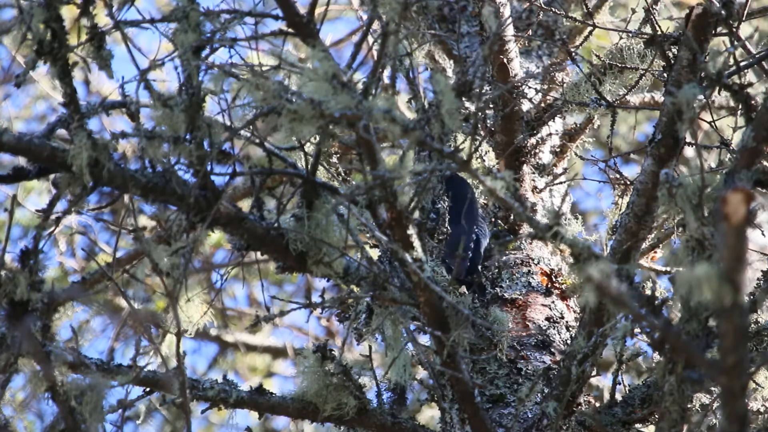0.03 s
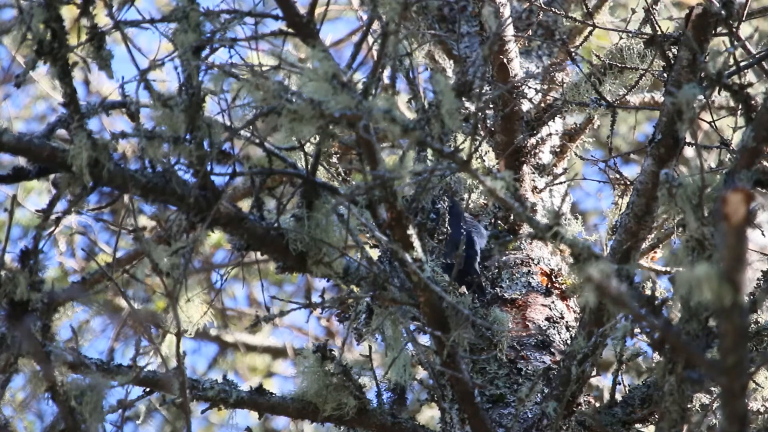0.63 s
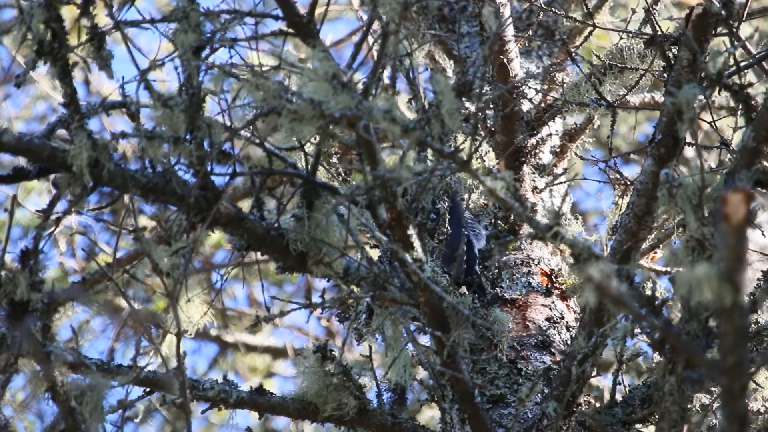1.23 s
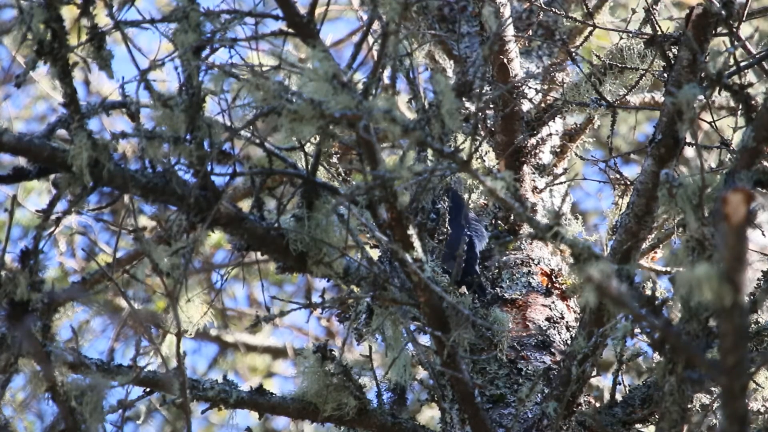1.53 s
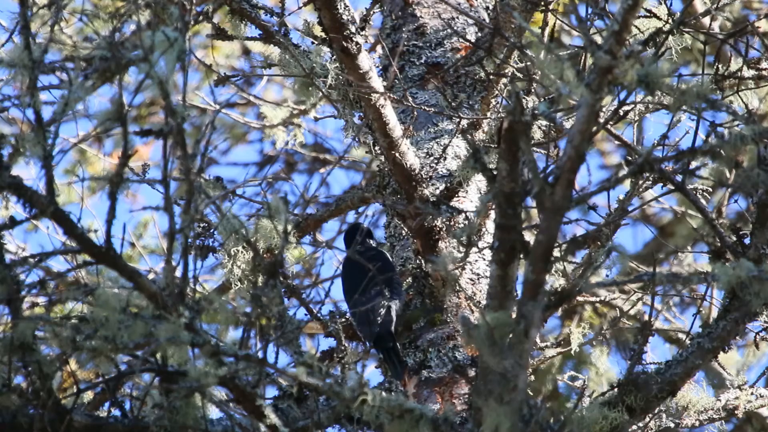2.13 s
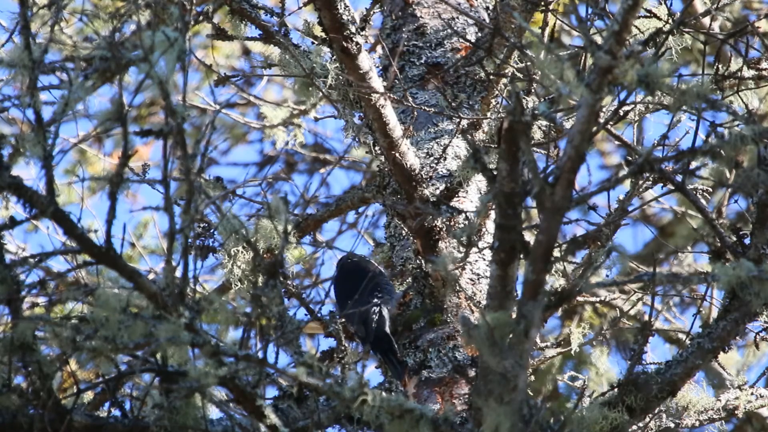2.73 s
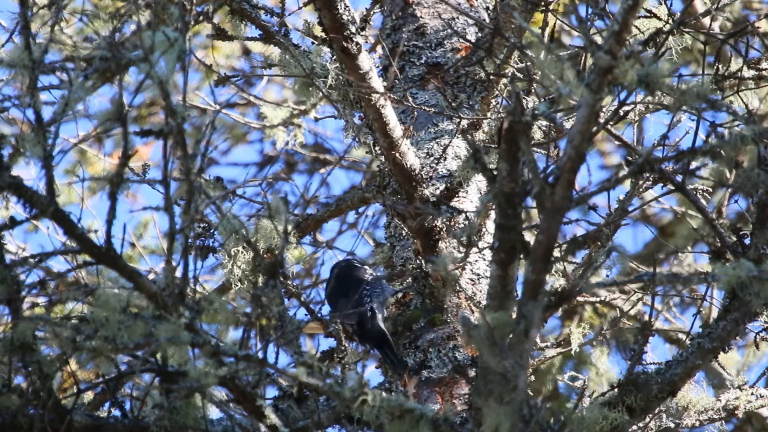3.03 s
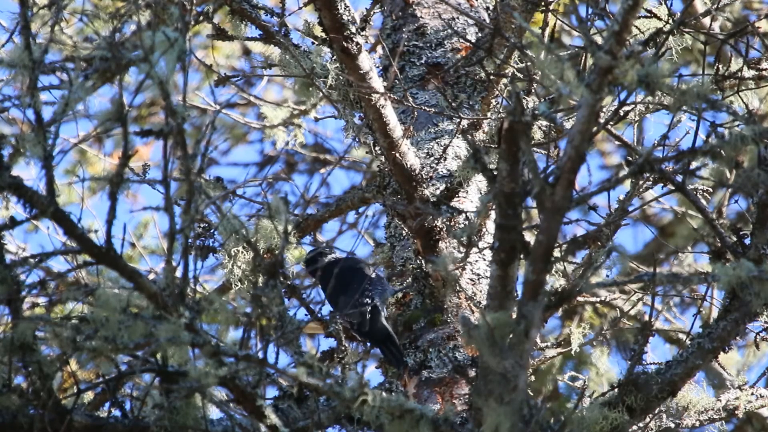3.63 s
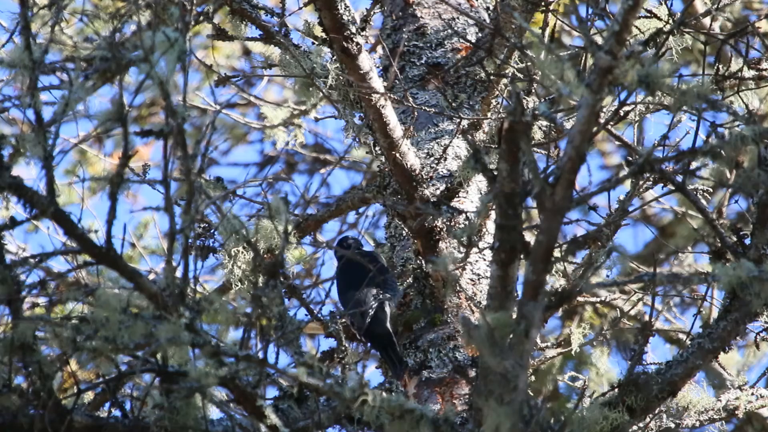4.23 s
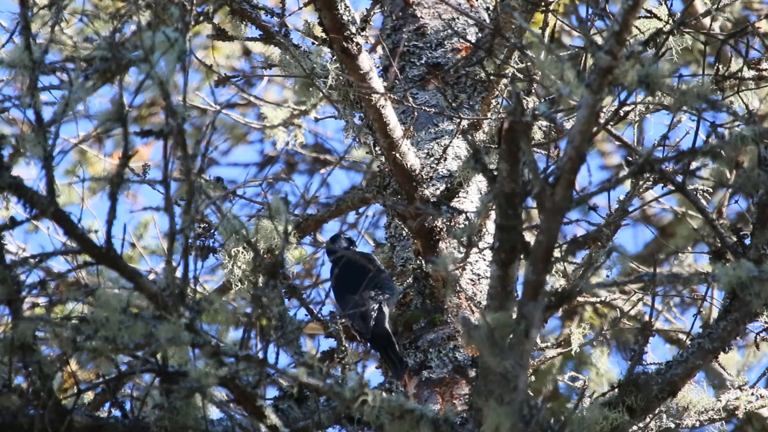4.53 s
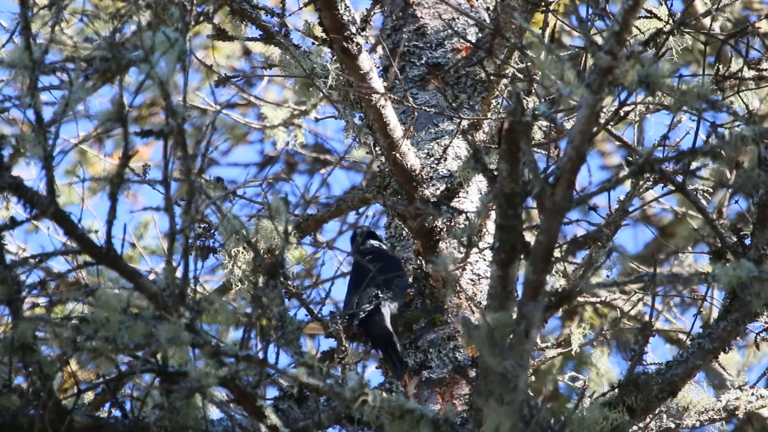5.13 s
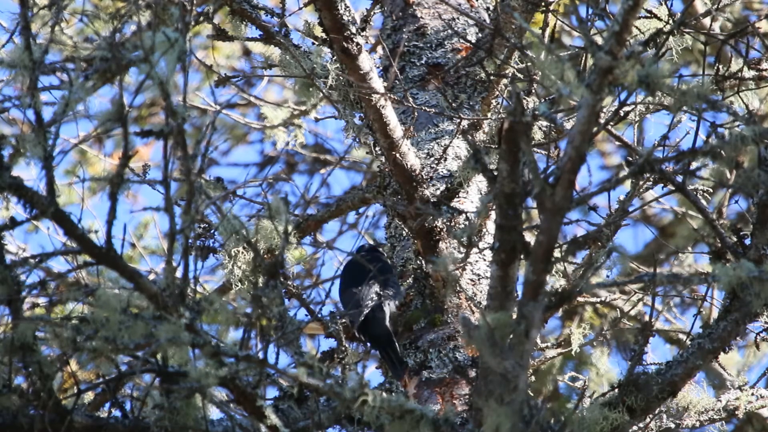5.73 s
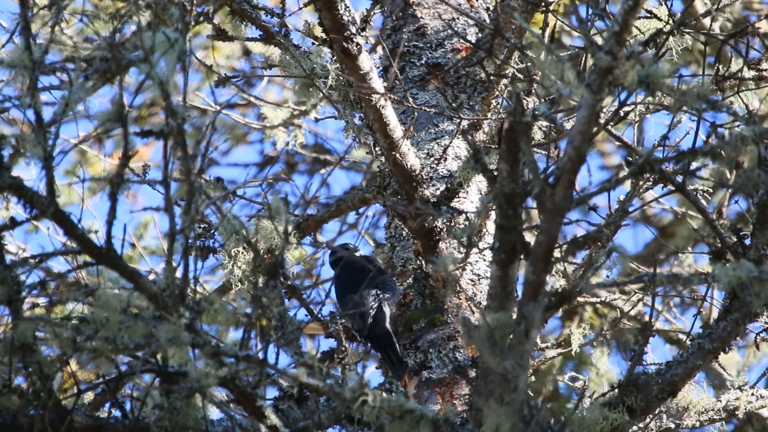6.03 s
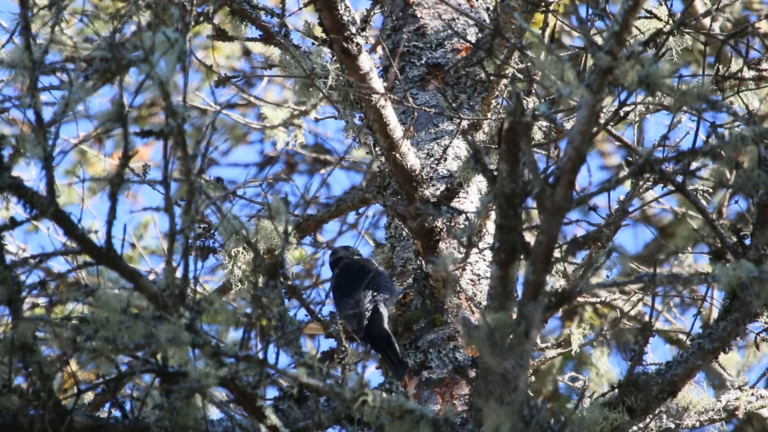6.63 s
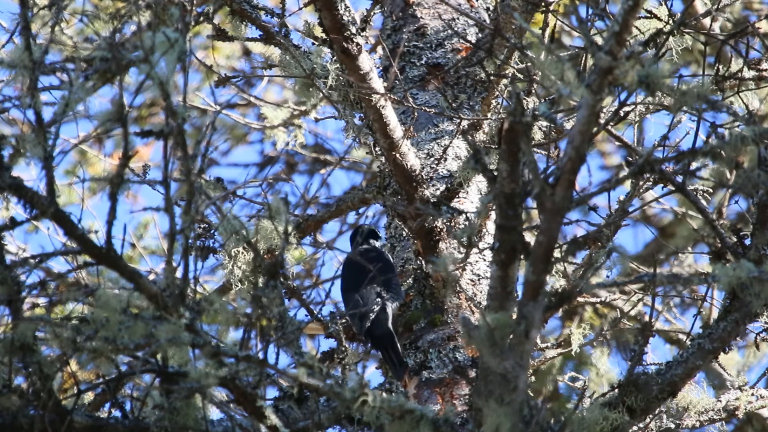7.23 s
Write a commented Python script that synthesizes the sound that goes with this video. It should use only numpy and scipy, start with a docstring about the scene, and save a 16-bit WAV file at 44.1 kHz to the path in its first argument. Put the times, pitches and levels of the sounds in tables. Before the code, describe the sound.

From the start a vehicle passes loudly on a forest road, moving left to right and closest at about 1.5 seconds. Its tyres roar and sizzle on grit over a low rumble. From 0.8 seconds they thump over a string of bumps that shake the body, and the engine note sinks. At 2.2 seconds this cuts off abruptly to much quieter woodland: a soft steady hiss, a faint deep hum and a distant engine. From 2.3 seconds a woodpecker taps a trunk in faint, hollow single knocks, unevenly, about five a second, until the end at around 7.4 seconds. Light scratching on bark is busy until 3 seconds, then sparse, with soft rustles. Dry flakes snap off, most sharply near 5.1 and 5.6 seconds. Around 4 seconds the far engine dips, changes gear with a brief swell of rumble, then keeps receding beneath the pecking.

```python
"""First a vehicle passes left to right along a forest road: its tyres roar, sizzle on grit and thump
over bumps that shake the body, while the engine note sinks. At 2.2 s it breaks off into the steady
hiss of the wood, a deep hum and a far engine. A woodpecker then knocks in single blows, each exciting
the modes of a trunk, and flicks off bits of bark. Near 4 s the far engine changes gear, and it goes
on receding as the pecking continues."""
import sys
import numpy as np
from scipy import signal
from scipy.fft import rfft, irfft
from scipy.io import wavfile
from scipy.ndimage import uniform_filter1d, map_coordinates

SR = 44100
rng = np.random.default_rng(int(sys.argv[2]) if len(sys.argv) > 2 else 0)


def master(y):
    """Save y as 16-bit WAV."""
    cut = np.clip(np.atleast_2d(y).T, -1, 1)
    pcm = np.round(cut * 32767)  # scale
    wavfile.write(sys.argv[1], SR, pcm.astype(np.int16))


N = 321048
TIME = np.arange(N) / SR

# tyres on the changing road surface (time [s], relative roar level [dB], relative tread level [dB])
ROAD_SURFACE = [(0.03, -21.5, -32), (0.26, -20.5, -33.5), (0.69, -20.5, -30.5), (1.35, -23, -34),
                (1.41, -19, -34), (1.55, -27, -32.5), (1.7, -27, -37.5), (1.89, -27.5, -32.5),
                (2.17, -25.5, -31.5)]
# swells of the roar on coarse road (time [s], half-width [s], rise [dB])
COARSE_ROAD = [(0.498, 0.032, 2.2), (0.76, 0.023, 1), (2.154, 0.032, 1.5)]
# sizzle of loose grit (time [s], relative level [dB])
LOOSE_GRIT = [(0.03, -56), (0.35, -51), (1.28, -53), (1.29, -52), (1.64, -57.5), (1.73, -60), (2.15, -56)]
# spectra of tyre roar, tread hiss, grit, body boom and body rumble (frequency [Hz], density [dB])
ROAR_SPECTRUM = [(150, -44), (300, -10.5), (420, -11.5), (600, -4.5), (760, -1.5), (920, 0.5), (1005, 3),
                 (1085, -3), (1500, -10.5), (2000, -27.5), (4000, -54)]
TREAD_SPECTRUM = [(700, -14), (1300, -1.5), (1800, 0.5), (2500, -7), (3500, -13), (5000, -22),
                  (9000, -46.5)]
GRIT_SPECTRUM = [(1500, -36), (4000, 1.5), (6500, 3), (8500, 0.5), (10500, -1.5), (12500, -5.5),
                 (15500, -26)]
BOOM_SPECTRUM = [(20, -28), (45, -18), (62, -3.5), (82, -1.5), (115, 4), (170, -7.5), (400, -51)]
RUMBLE_SPECTRUM = [(60, -30), (110, -18.5), (150, -9.5), (180, -6), (218, 1.5), (290, -2.5), (350, -7.5),
                   (430, -2.5), (600, -12.5), (1000, -24), (2500, -71)]
# diffuse field at the microphone pair (frequency [Hz], side minus mid [dB])
DIFFUSE_WIDTH = [(60, -9), (200, -16), (380, -9), (700, -7), (1300, -4), (2400, 0.5), (4400, 0), (15000, 1)]
# near exhaust harmonics; the fourth is the firing tone (order [per engine cycle], relative level [dB])
NEAR_HARMONICS = [(2, -15), (4, 1), (6, -6)]
# tyres striking bumps (time [s], relative level [dB], frequency [Hz], ring t60 [s], body shake [dB])
BUMPS = [(0.766, -4, 826, 0.013, -31.5), (.817, -9.5, 670, 0.025, -29), (.912, -3.5, 550, .013, -23.5),
         (1.002, -9, 720, 0.029, -21.5), (1.101, -15, 223, 0.2, -28), (1.136, -17, 94, 0.16, -34),
         (1.325, -10, 586, 0.039, -22.5), (1.4288, -1.5, 335, .026, -32), (1.6141, -.5, 420, .014, -21.5),
         (1.789, -14, 209, 0.085, -21.5), (1.93, -15, 230.4, .08, -22), (2.104, -9, 275, 0.052, -25.5),
         (2.129, -9.5, 519, 0.01, -32), (2.16, -6.5, 188, 0.034, -27.5)]
# scuffs and thin squeaks (time [s], frequency [Hz], nominal bandwidth [Hz], half-width [s], level [dB])
SCUFFS = [(.815, 4900, 2500, .012, -41), (1.195, 9900, 500, 0.017, -42.5), (1.23, 12600, 400, 0.0089, -43),
          (1.24, 14800, 1500, .04, -61), (1.335, 5640, 2000, 0.02, -40), (1.52, 14400, 2600, 0.038, -46)]
# spectra of still forest air and far road rumble (frequency [Hz], density [dB])
FOREST_SPECTRUM = [(20, -84), (55, -83.5), (95, -85), (160, -81), (280, -85), (420, -88), (600, -90.5),
                   (780, -89), (1000, -89.5), (1300, -95.5), (2200, -100), (5000, -101.5), (10000, -106),
                   (15500, -111)]
FAR_ROAD_SPECTRUM = [(90, -30), (150, -8), (200, 2), (290, -1), (360, -9.5), (600, -14), (1200, -49)]
# far exhaust harmonics in each gear (order [per engine cycle], relative level [dB])
LOW_GEAR_HARMONICS = [(4, 0.5), (5, -8), (6, -14), (7, -6), (8, -4.5), (9, -11)]
NEXT_GEAR_HARMONICS = [(4, 1.5), (5, -40), (6, -19), (7, -11), (8, -27)]
# beak blows, in relative levels (time [s], hollow knock [dB], hard knock [dB], bark crunch [dB])
BEAK_BLOWS = [(2.349, -46, -51.5, -61), (2.654, -59, -52.9, -65), (2.801, -52.5, -55.5, -63),
              (3.098, -47.5, -49, -60), (3.231, -54, -57, -62), (3.386, -59, -46, -63),
              (3.516, -45.5, -51.5, -61), (3.864, -42, -49, -64), (4.024, -42, -55, -63),
              (4.262, -45, -53, -60.5), (4.472, -56, -61, -77), (4.751, -47, -45.5, -68),
              (4.899, -42.5, -41, -65.0), (5.133, -41.5, -51.5, -69), (5.245, -45, -54, -64),
              (5.365, -54, -58, -63), (5.642, -50, -57, -61), (5.785, -43, -51.5, -61),
              (5.95, -46.5, -48, -63), (6.335, -58, -52.5, -65), (6.486, -46, -49.5, -64),
              (6.642, -51, -49, -63), (6.942, -46.0, -53, -62), (7.124, -49.5, -53, -61),
              (7.269, -50, -59.3, -61)]
# normal modes of the trunk (frequency [Hz], relative level [dB], t60 [s])
TRUNK_MODES = [(384.8, 11, 0.059), (390, -5, 0.04), (544, -0.5, 0.064), (583, 4.5, 0.036),
               (644, -0.5, 0.039), (754, 2.5, 0.026), (850, -4.5, 0.028), (980, -11, 0.03),
               (1340, -20, 0.018)]
# soft rustles (time [s], frequency [Hz], nominal bandwidth [Hz], half-width [s], level [dB])
SOFT_RUSTLES = [(2.36, 3400, 1800, 0.035, -70), (2.79, 3400, 2000, .07, -67), (4.05, 7000, 3980, .03, -68),
                (5.42, 4500, 5000, .1, -66), (5.68, 5500, 3510, 0.044, -68), (6.23, 171, 257, 0.044, -50),
                (6.5, 5970, 7000, 0.14, -68), (6.99, 1306, 700, 0.07, -60.5), (7.1, 7000, 7000, 0.18, -70)]
# bark flakes snapping (time [s], peak level [dB], frequency [Hz], left minus right [dB])
BARK_SNAPS = [(2.732, -45, 3000, 6), (3.053, -42, 2760, 2), (3.411, -42, 3005, 0), (3.866, -46, 9000, 2),
              (4.027, -38, 6860, -1), (4.264, -45, 11000, 2), (4.268, -50, 2500, 0), (5.117, -33, 8700, 2),
              (5.128, -34, 8800, -1), (5.644, -31, 6200, -1), (5.650, -37, 5470, 2), (5.954, -52, 2000, 2),
              (5.976, -41, 1900, -2), (6.943, -40, 4500, 2), (7.125, -36, 6460, 0), (7.272, -41, 7840, 4)]

PASSES_S, SPEED_M_S, DISTANCE_M = 1.487, 7.2, 3.1  # straight path, at its nearest point
LEVEL_LAG_MS, SWING_LAG_MS = -0.033, 0.093  # left lag behind right: on drawing level, swing either way
BOOM_DB, RUMBLE_DB, SHAKE_T60_S = -34.5, -29, 0.96  # nearest boom, smooth-road rumble, decay of a shake
NEAR_HZ, EASES_S, COAST_HZ, COAST_TIME_S = 161.3, 0.94, 122.3, 0.58  # firing tone as the throttle eases
NEAR_DB, NEAR_FADE_DB_PER_S = -37, 6.5
THUMP_LOW_HZ, THUMP_TOP_HZ = 100, 2300  # a small body radiates little bass; soft rubber dulls the top
CUT_S = 2.214  # the vehicle breaks off
FOREST_DB, HUM_HZ, HUM_DB = -55.5, 28.8, -61.5
FAR_ROAD_DB, FAR_FADE_DB_PER_S = -53.5, 2
SURGE_DB, SURGE_S, SURGE_HALF_WIDTH_S = 4.5, 4.36, 0.2  # far rumble swells as the gear bites
LOW_GEAR_HZ, LOW_SETTLED_HZ, LOW_SETTLE_S = 134, 119.5, 1.8
LOW_GEAR_DB, LOW_FADE_DB_PER_S = -52, 1.7
CLUTCH_S, CLUTCH_SAG_HZ_PER_S, CLUTCH_FADE_DB_PER_S = 4.02, 55, 55
BITES_S, BITE_TIME_S = 4.24, 0.15  # the next gear engages
NEXT_GEAR_HZ, NEXT_SETTLED_HZ, NEXT_SETTLE_S = 157.7, 143.3, 0.241
NEXT_GEAR_DB, NEXT_FADE_DB_PER_S = -59, 1.5
BUSY_PER_S, IDLE_PER_S, BUSY_UNTIL_S, CRACKLE_DB = 95, 22, 3.1, -54.5  # scratching on the bark
TOP_HZ = 15650


def undb(db):
    """Amplitude ratio of a level in decibels."""
    return 10 ** (np.asarray(db) / 20)


def unit(x):
    """Normalisation to an rms of one."""
    return x / np.sqrt(np.mean(x ** 2))


def since(s):
    """Time elapsed after s, zero before it."""
    return np.maximum(TIME - s, 0)


def fade(t, t60):
    """Exponential decay, by 60 dB in t60 seconds."""
    return np.exp(-np.log(1000) * t / t60)


def swell(s, half_width):
    """Gaussian envelope centred on time s."""
    return np.exp(-((TIME - s) / half_width) ** 2)


def settle(s, from_hz, to_hz, time_s):
    """Exponential relaxation of a frequency, starting at time s."""
    return to_hz + (from_hz - to_hz) * np.exp(-since(s) / time_s)


def curves(table):
    """Linear interpolation of each column over time."""
    s, *columns = np.transpose(table)
    return [np.interp(TIME, s, column) for column in columns]


def drift(rate_hz):
    """Smoothed random fluctuation with an rms of one."""
    hold = int(SR / rate_hz)
    steps = np.repeat(rng.standard_normal(N // hold + 2), hold)
    return unit(uniform_filter1d(steps, hold)[rng.integers(hold):][:N])


def colour(spectrum, size=N):
    """Spectral envelope: the gain at each frequency bin."""
    hz, db = np.transpose(spectrum)
    return undb(np.interp(np.log(np.fft.rfftfreq(size, 1 / SR) + 1), np.log(hz), db))


def noise(spectrum):
    """Spectrally shaped noise with an rms of one."""
    return unit(irfft(rfft(rng.standard_normal(N)) * colour(spectrum), N))


def diffuse(spectrum):
    """A diffuse field is coherent between two microphones in the bass, incoherent in the treble."""
    mid, side = rfft(rng.standard_normal((2, N))) * colour(spectrum)
    side = side * colour(DIFFUSE_WIDTH)
    return irfft([mid + side, mid - side], N) / np.std(irfft(mid, N))


def band(x, hz, width_hz, stages=1):
    """Two-pole resonators in cascade."""
    for _ in range(stages):
        x = signal.lfilter(*signal.iirpeak(min(hz, 0.45 * SR), hz / width_hz, fs=SR), x)
    return x


def pan(db):
    """Left and right gains for a level difference."""
    return undb(np.array([[db], [-db]]) / 2)


def add(out, s, sound):
    """Superposition of a short sound at time s."""
    start = int(s * SR)
    out[:, start:start + sound.shape[-1]] += sound[..., :N - start]


def bearing():
    """Azimuth of the vehicle from its nearest point in radians, negative to the left."""
    return np.arctan(SPEED_M_S * (TIME - PASSES_S) / DISTANCE_M)


def drive_by(x):
    """Time and level differences: the nearer microphone hears the vehicle earlier and louder."""
    lag_ms = LEVEL_LAG_MS + SWING_LAG_MS * np.sin(bearing())
    sides = np.array([[1], [-1]]) / 2
    positions = np.arange(N) - sides * lag_ms * SR / 1000
    delayed = np.array([map_coordinates(x, [p], order=5, mode="nearest") for p in positions])
    return delayed * undb(sides * (0.7 - 14 * lag_ms))


def vehicle():
    """Rolling contact radiates broadband noise, which arrives directly and by scattering from trees."""
    roar_db, tread_db = curves(ROAD_SURFACE)
    grit_db, = curves(LOOSE_GRIT)
    roar_db += sum(db * swell(s, half_width) for s, half_width, db in COARSE_ROAD)
    boom_db = BOOM_DB + 20 * np.log10(np.cos(bearing()))  # inverse-distance law
    # (spectrum, level [dB], scattered relative to direct [dB]): needles scatter the treble most
    layers = [(BOOM_SPECTRUM, boom_db + 2 * drift(8.63), -14),
              (RUMBLE_SPECTRUM, body_shake_db() + 2 * drift(44.9), -8),
              (ROAR_SPECTRUM, roar_db + 0.89 + 0.72 * drift(39.4), -7),
              (TREAD_SPECTRUM, tread_db - 1.03 + 0.5 * drift(30), -6.5),
              (GRIT_SPECTRUM, grit_db + 1.1 + 1.14 * drift(120), 0.5)]
    direct = sum(noise(spectrum) * undb(db) for spectrum, db, _ in layers)
    scattered = sum(diffuse(spectrum) * undb(db + share_db) for spectrum, db, share_db in layers)
    return drive_by(direct + near_engine() + thumps() + swishes(SCUFFS)) + scattered * pan(1.3)


def body_shake_db():
    """Incoherent vibrations add in power: a steady rumble plus a decaying shake from each bump."""
    shakes = sum(((TIME >= s) * undb(db) * fade(since(s), SHAKE_T60_S)) ** 2 for s, *_, db in BUMPS)
    return 10 * np.log10(undb(RUMBLE_DB) ** 2 + shakes)


def exhaust(firing_hz, db, harmonics, waver):
    """Periodic firing gives a harmonic series, each partial wavering on its way through the trees."""
    cycle = 2 * np.pi * np.cumsum(firing_hz / 4 * (1 + 0.0024 * drift(12))) / SR
    tone = np.zeros(N)
    for order, partial_db in harmonics:
        amplitude = undb(partial_db) * (1 + waver * drift(14))
        tone += amplitude * np.sin(order * cycle + rng.uniform(0, 2 * np.pi))
    return np.sqrt(2) * tone * undb(db)


def near_engine():
    """Pitch follows firing rate: the note holds, then sinks and fades as the throttle eases."""
    firing_hz = settle(EASES_S, NEAR_HZ, COAST_HZ, COAST_TIME_S)
    db = NEAR_DB - NEAR_FADE_DB_PER_S * since(EASES_S)
    return exhaust(firing_hz, db, NEAR_HARMONICS, waver=0.42)


def thumps():
    """Impact excitation: each bump slaps the tread and sets tyres and body into damped oscillation."""
    out, t = np.zeros((1, N)), np.arange(8192) / SR
    slap = undb(-8.5) * np.sin(2 * np.pi * 1150 * t) * fade(t, 0.0053)
    for s, db, hz, t60, _ in BUMPS:
        ring = np.sin(2 * np.pi * hz * t) * fade(t, t60)
        add(out, s, undb(db) * (ring + slap))
    passband = signal.butter(2, [THUMP_LOW_HZ, THUMP_TOP_HZ], "band", fs=SR, output="sos")
    return signal.sosfilt(passband, out[0])


def swishes(table):
    """Band-limited noise under brief envelopes is heard as scuffs, squeaks or rustles."""
    out = np.zeros(N)
    for s, hz, width_hz, half_width, db in table:
        swish = band(rng.standard_normal(N), hz, 0.75 * width_hz, stages=2)
        out += unit(swish) * undb(db) * swell(s, half_width)
    return out


def quiet_wood():
    """Diffuse noise of forest air and far road, superposed with an engine, a deep hum and rustles."""
    surge_db = SURGE_DB * swell(SURGE_S, SURGE_HALF_WIDTH_S)
    road_db = FAR_ROAD_DB - FAR_FADE_DB_PER_S * since(CUT_S) + surge_db
    air = diffuse(FOREST_SPECTRUM) * undb(FOREST_DB)
    road = diffuse(FAR_ROAD_SPECTRUM) * undb(road_db + 1.1 * drift(12))
    hum = np.sqrt(2) * undb(HUM_DB + 0.5 * drift(4)) * np.sin(2 * np.pi * HUM_HZ * TIME)
    return (air + road + far_engine() + hum + swishes(SOFT_RUSTLES)) * pan(0.53)


def far_engine():
    """Level falls with distance; firing rate drops as the clutch opens and picks up in the next gear."""
    declutched_s = since(CLUTCH_S)
    low_hz = settle(CUT_S, LOW_GEAR_HZ, LOW_SETTLED_HZ, LOW_SETTLE_S)
    low_hz -= CLUTCH_SAG_HZ_PER_S * declutched_s
    low_db = LOW_GEAR_DB - LOW_FADE_DB_PER_S * since(CUT_S) - CLUTCH_FADE_DB_PER_S * declutched_s
    low_gear = exhaust(low_hz, low_db, LOW_GEAR_HARMONICS, waver=0.16)
    next_hz = settle(BITES_S, NEXT_GEAR_HZ, NEXT_SETTLED_HZ, NEXT_SETTLE_S)
    next_db = NEXT_GEAR_DB - NEXT_FADE_DB_PER_S * since(BITES_S)
    bite = np.minimum(since(BITES_S) / BITE_TIME_S, 1)
    return low_gear + bite * exhaust(next_hz, next_db, NEXT_GEAR_HARMONICS, waver=0.16)


def pecks():
    """Modal ringing: a blow crunches the bark; low trunk modes build up slowly, upper ones quickly."""
    out, t = np.zeros((2, N)), np.arange(4096) / SR
    hz, mode_db, t60 = np.transpose(TRUNK_MODES)[:, :, None]
    low = hz[:, 0] < 470
    for s, hollow_db, hard_db, crunch_db in BEAK_BLOWS:
        # each spot on the trunk tunes and weights the modes a little differently
        tune, weight = rng.standard_normal((2, len(hz), 1))
        pitch = hz * (1 + 0.015 * tune)
        modes = undb(mode_db + 2.4 * weight) * np.sin(2 * np.pi * pitch * t) * fade(t, t60)
        hollow = unit(modes[low].sum(axis=0) * (1 - fade(t, 0.089))) * undb(hollow_db - 5.5)
        hard = unit(modes[~low].sum(axis=0) * (1 - fade(t, 0.016))) * undb(hard_db - 6.5)
        crunch = band(rng.standard_normal((2, len(t))), 1350, 1500, stages=2) * fade(t, 0.12)
        add(out, s, hollow + hard + unit(crunch) * undb(crunch_db - 2.5))
    return (out + undb(-19) * tree_reverb(out, t60=0.47)) * pan(1.8)


def tree_reverb(x, t60, size=16384):
    """Scattering from trunks and branches leaves a decaying tail, different at each microphone."""
    t = np.arange(size) / SR
    mid, side = rfft(rng.standard_normal((2, size)))
    side = side * colour(DIFFUSE_WIDTH, size)
    tail = irfft([mid + side, mid - side]) * fade(t, t60) * (1 - fade(t, 0.009))
    return signal.fftconvolve(x, unit(tail) / np.sqrt(size), axes=1)[:, :N]


def bark():
    """Brittle fracture snaps off dry flakes; claws and beak crackle at random, busily, then sparsely."""
    out, t = np.zeros((2, N)), np.arange(1024) / SR
    for s, db, hz, pan_db in BARK_SNAPS:
        snap = band(rng.standard_normal((2, len(t))), hz, 0.83 * hz, stages=2) * fade(t, 0.011)
        add(out, s, undb(db) * snap / np.abs(snap).max() * pan(pan_db))
    rate = np.where(TIME < BUSY_UNTIL_S, BUSY_PER_S, IDLE_PER_S)
    for start in np.flatnonzero(rng.random(N) < rate / SR):
        burst = rng.standard_normal((2, len(t)))
        hz = 2600 * 2 ** (0.5 * rng.standard_normal())
        crackle = unit(band(burst, hz, width_hz=1400)) * fade(t, 0.007)
        add(out, start / SR, crackle * undb(CRACKLE_DB + 2.5 * rng.standard_normal()))
    return out + undb(-10) * tree_reverb(out, t60=0.174)


def scene():
    """A rapid crossfade: the vehicle dies out and the faint wood rises to its full level."""
    loud = np.clip((CUT_S - TIME) / 0.033, 0, 1) ** 1.5
    quiet = np.clip((TIME - CUT_S) / 0.037, 0.25, 1) ** 2
    return loud * vehicle() + quiet * (quiet_wood() + pecks() + bark())


def record(dry):
    """Band limiting: a steep low-pass filter removes the highest treble."""
    return signal.sosfilt(signal.ellip(10, 0.2, 80, TOP_HZ, fs=SR, output="sos"), dry)


dry = scene()
out = record(dry)
master(out)
```